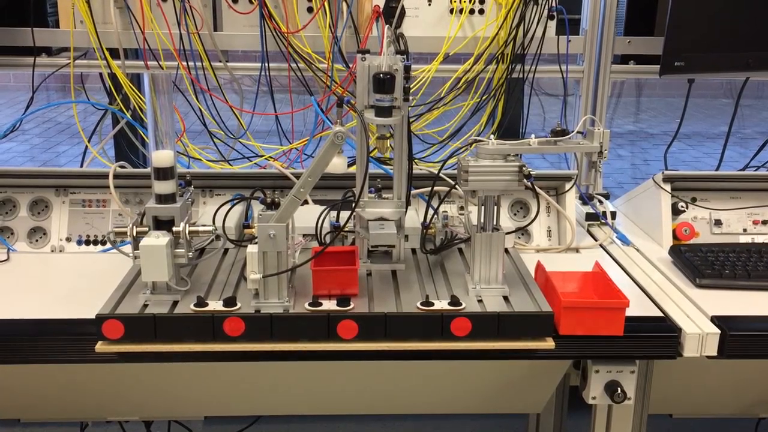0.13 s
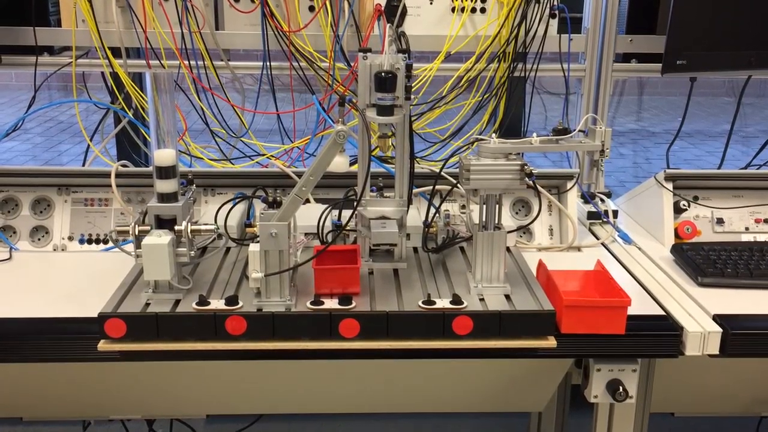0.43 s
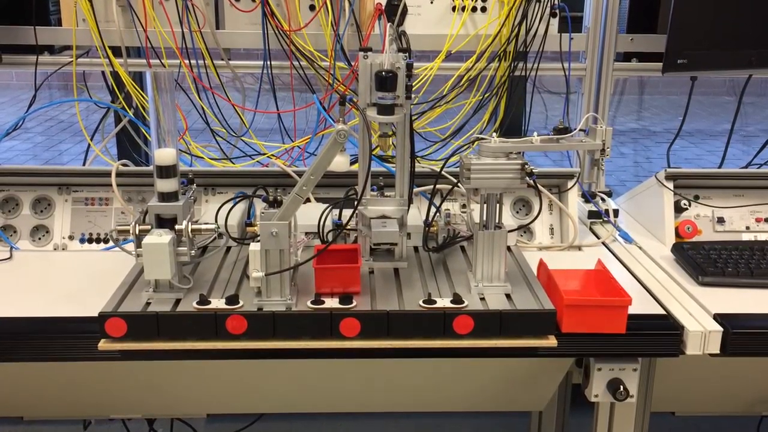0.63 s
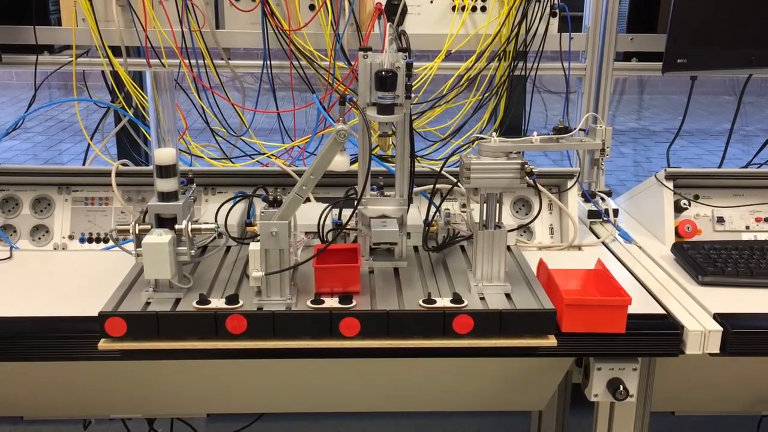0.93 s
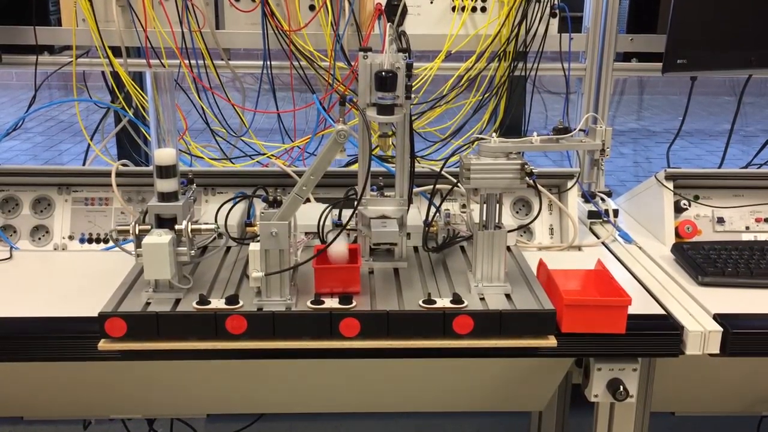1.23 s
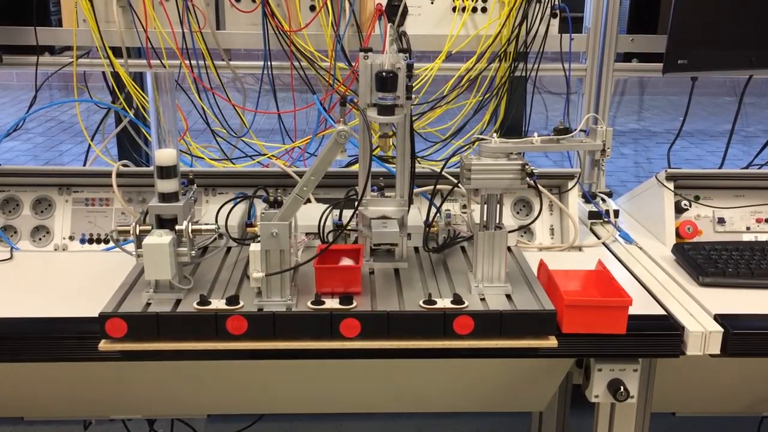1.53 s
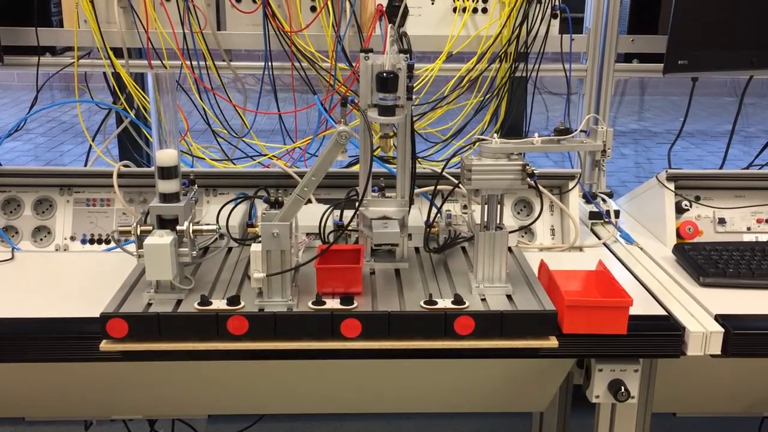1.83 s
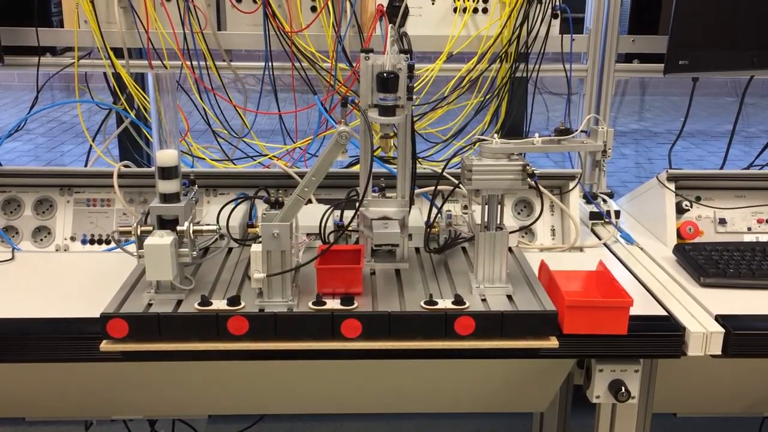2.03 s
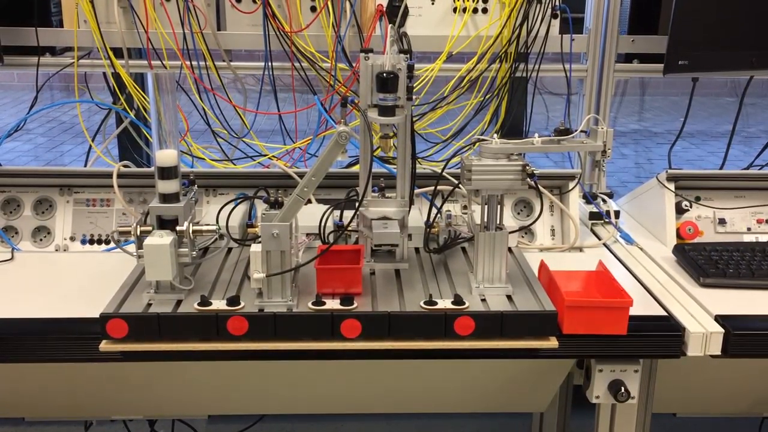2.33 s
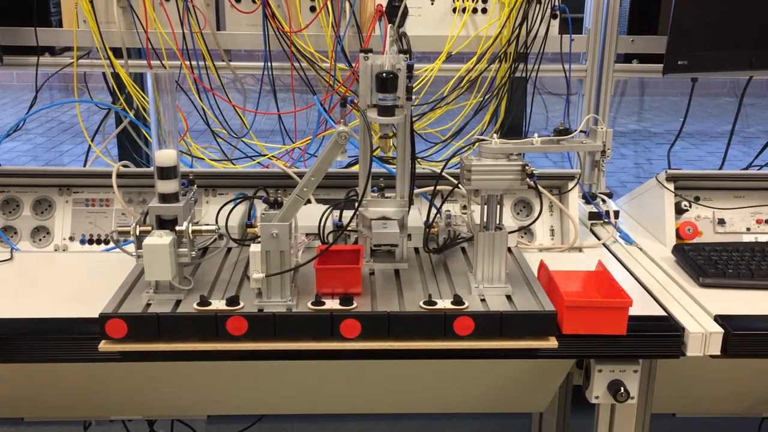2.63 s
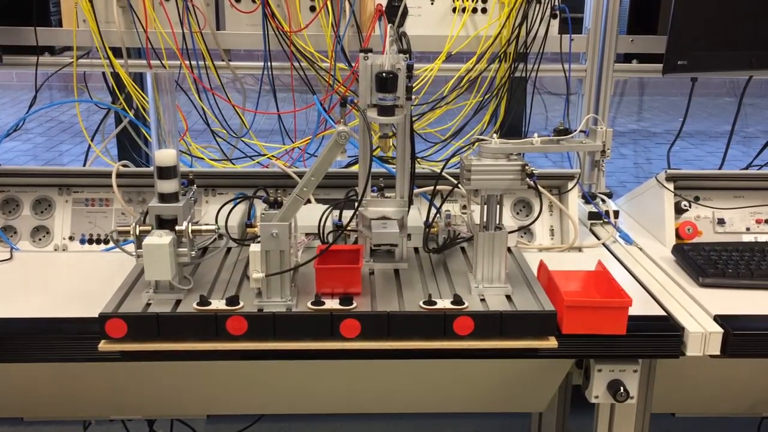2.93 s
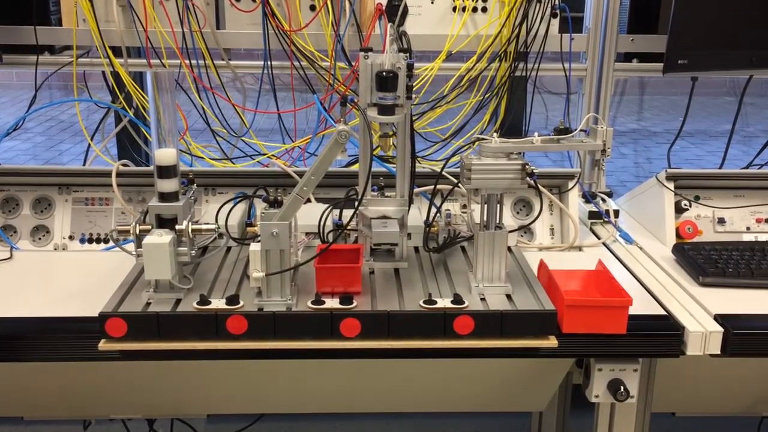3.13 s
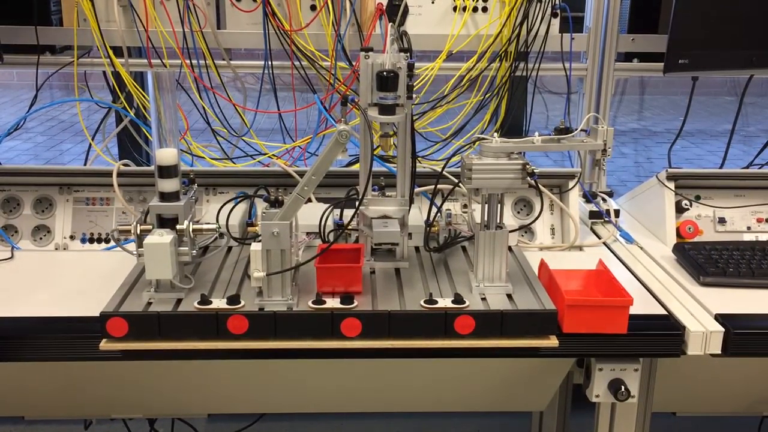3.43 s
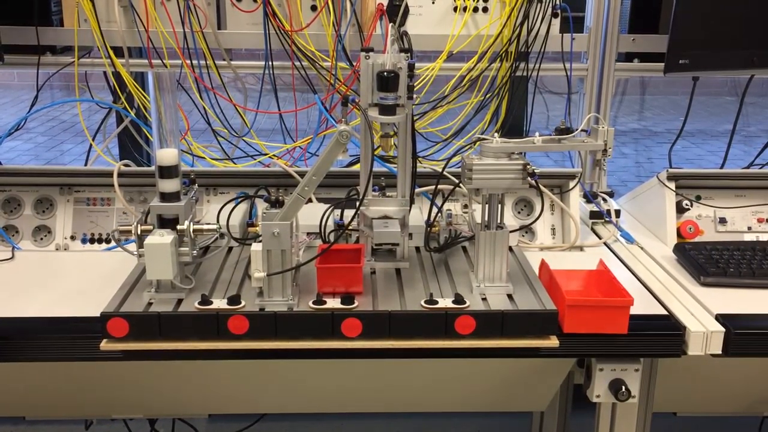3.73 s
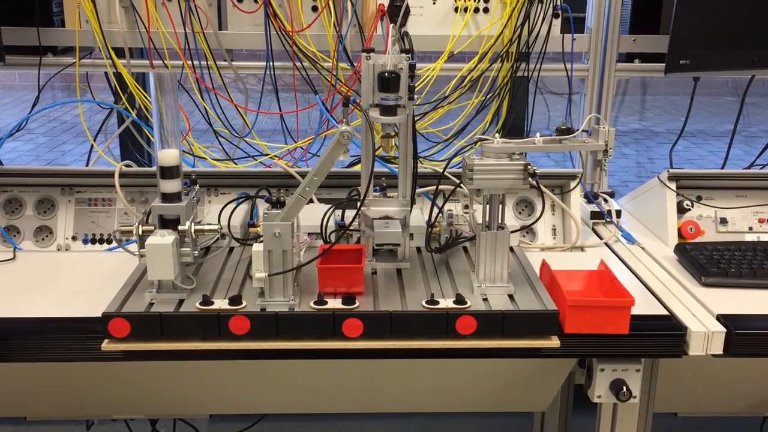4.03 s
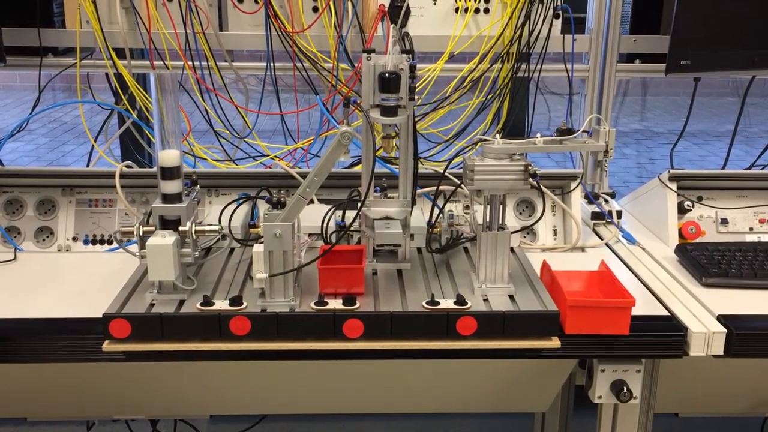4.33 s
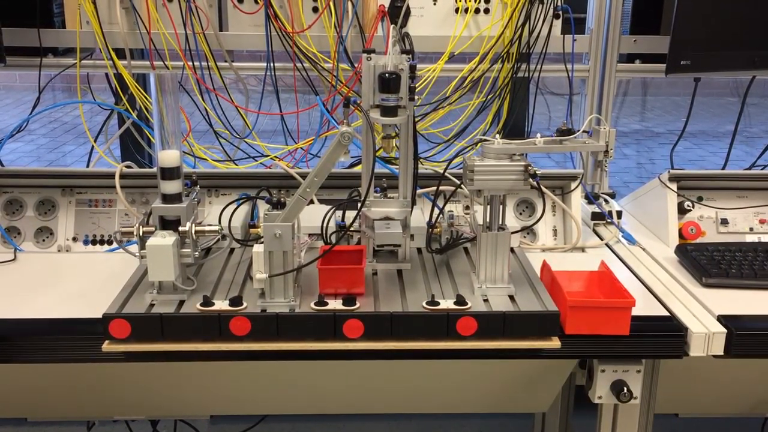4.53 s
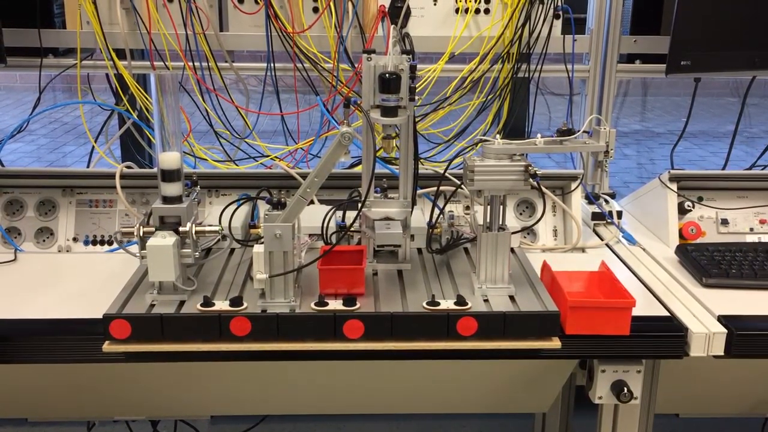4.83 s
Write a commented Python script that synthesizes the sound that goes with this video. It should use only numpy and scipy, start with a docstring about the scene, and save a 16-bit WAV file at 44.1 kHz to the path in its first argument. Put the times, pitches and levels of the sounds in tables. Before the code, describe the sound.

A nozzle on a pneumatic machine hisses steadily, then cuts off with a clack. A small hard part drops into a plastic box and bounces a few times. After a quiet stretch with faint knocks and ventilation hum, cylinders clack loudly and vent air for a second. The hiss resumes and continues, with one more clack and a small tick. A phone picks it up from about two metres in a hard-walled lab.

```python
"""A pneumatic handling station

On a bench in a hard-walled lab, a vacuum nozzle hisses with turbulent air. Cylinders strike their end
stops, shake the bench and puff air; one vents through a silencer. A dropped workpiece bounces in a
plastic box. Faint knocks, a low drone and ventilation lie behind. The room returns two echoes and a
tail of about half a second to a phone two metres away."""
import sys
import numpy as np
from scipy import signal
from scipy.fft import rfft, irfft, next_fast_len
from scipy.io import wavfile
from scipy.ndimage import uniform_filter1d

SR = 44100
rng = np.random.default_rng(int(sys.argv[2]) if len(sys.argv) > 2 else 0)


def dump_mix(stems):
    """Bounce the given channels to the path in sys.argv[1] as a 16-bit WAV at rate SR."""
    frames = np.atleast_2d(stems).T  # one column per channel
    limited = np.clip(frames, -1, 1)  # hard clip at full scale
    pcm = np.round(limited * 32767).astype(np.int16)
    wavfile.write(sys.argv[1], SR, pcm)


N = 392049
T = np.arange(N) / SR


def cylinders():
    """Impact excitation: pistons ring the aluminium frame and the bench as air cracks from the valve."""
    # Each row: start in seconds, knock level before its low-pass in dB, knock centre in Hz, chatter in
    # seconds, air crack level in dB, crack centre in Hz, bench thump level in dB.
    clacks = [(1.1983, -7.5, 1800, .0003, -27.5, 9000, -26), (4.888, -15, 1300, 0.001, -20.5, 7760, -24.5),
              (4.8916, -17.5, 1820, .001, -21, 8500, -31), (4.91, -14.5, 3050, .0002, -28, 9500, -59),
              (4.9736, -0.5, 3800, 0.000393, -9.5, 5800, -32), (4.978, -9.5, 718, .002, -37, 6000, -40),
              (4.990, -17.5, 1070, 0.00203, -13, 11000, -23.5), (4.996, -13.5, 3970, .0009, -34, 5050, -27),
              (5.949, -45, 700, 0.00187, -60, 6000, -49.5), (6.983, -32, 2800, .0015, -62, 4000, -56),
              (6.988, -9, 1670, 0.00014, -60, 4000, -29.5), (6.991, -29, 1480, 0.0021, -27.5, 7900, -49.5)]
    # Each row of both: mode frequency in Hz, relative level in dB, t60 in seconds.
    frame_modes = [(684, -12, 0.03), (945, -10.5, .025), (1235, -4.5, 0.02), (1480, 2, 0.011),
                   (1800, 0, .013), (2150, 0.5, .015), (2460, -2.5, .015), (2600, -12.5, 0.043),
                   (2980, -7, 0.014), (3420, -8.5, 0.0092), (3950, -4, .01), (4500, -2, .007),
                   (5070, -5, .008), (6180, -9, 0.024)]
    bench_modes = [(62, -12.5, 0.27), (115.7, -1.5, 0.067), (140, -5, 0.19), (163.4, -2.5, 0.22),
                   (206, 4, 0.073), (248, -1.5, .1), (308, -5, 0.062), (370, 2, .08), (480, -10, .08),
                   (600, -5.5, 0.066)]
    out = np.zeros(N)
    for start, db, hz, chatter_s, air_db, air_hz, thump_db in clacks:
        knock = ring(frame_modes, db, hz, chatter_s, slope_db=12, low_hz=.31 * hz)
        add(out, start, lowpass(knock, 2.5 * hz))  # a contact of finite length drives little treble
        add(out, start, burst(air_db, t60=.028, hz=air_hz, width=1.8 * air_hz))
        add(out, start, ring(bench_modes, thump_db, 190, chatter_s=.003, slope_db=5.5, low_hz=94))
    return out


def workpiece():
    """Free vibration: each bounce cracks sharply and leaves the plastic box ringing around 1-2 kHz."""
    # Each row: start in seconds, knock level in dB, knock centre in Hz, crack level in dB.
    bounces = [(1.4037, -0.5, 1100, -8), (1.4073, 4, 1930, -12.5), (1.425, -14, 1002, -26),
               (1.6002, -2.5, 1428, -18.5), (1.6983, 0, 1300, -17), (1.7084, -16, 1500, -26.5),
               (1.721, -14.5, 1100, -31.5), (1.769, -8.5, 1590, -25)]
    # Each row: mode frequency in Hz, relative level in dB, t60 in seconds.
    box_modes = [(980, -4, 0.065), (1090, -7.5, 0.096), (1163, 0, 0.025), (1293, -3, 0.085),
                 (1373, -1.5, 0.04), (1550, 0, .03), (1840, -4, .03), (1840, 1, 0.017), (1920, -5, 0.045),
                 (2040, -4, .03), (2176, -1.5, 0.016), (2270, -11.5, .03), (2385, -9, .02),
                 (2840, -2.5, 0.032), (3040, -10, 0.043), (3560, 1.5, .015), (3900, -11.5, 0.0078),
                 (4300, -16.5, .015), (5840, -16.5, .012), (6700, -2.5, .01)]
    out = np.zeros(N)
    for start, db, hz, crack_db in bounces:
        add(out, start, ring(box_modes, db, hz, chatter_s=.0006, slope_db=7.5, low_hz=856, scatter_db=3))
        add(out, start, burst(crack_db, t60=.03, hz=5600, width=5600))
        add(out, start, burst(crack_db - 2.5, t60=.012, hz=12500, width=5000))  # the hard piece ticks
    return out


def nozzle():
    """Jet noise: turbulence excites the nozzle's resonances; body and treble flicker independently."""
    # Each row: opening and shutting times in seconds, relative hiss level in dB, treble gain in dB.
    blows = [(-1, 1.197, -49, 2), (5, 9.5, -47.5, 3.5)]
    # Each row: frequency in Hz, relative spectral density in dB.
    jet_spectrum = [(180, -51), (300, -26), (582, -33), (797, -16.5), (895, -23.5), (1070, -12.5),
                    (1680, -9.5), (2080, 2.5), (2670, -8), (3050, -2.5), (4850, -13.5), (6530, -10),
                    (7830, -16.5), (13100, -13.5), (15700, -20)]
    # Each row: centre in Hz, width in Hz, gain in dB.
    resonances = [(1043, 60, 8), (1334, 70, 9.5), (1610, 60, -1), (2100, 200, -1), (2413, 79, 0.5),
                  (3004, 210, 4), (3490, 80, 1.5), (8480, 110, 3), (10200, 83, 3.5), (11000, 230, 4),
                  (12000, 200, 2.5), (13500, 130, 1), (5630, 150, 1.5), (5700, 150, 4.5), (6660, 150, 4.5)]
    valve_s, sag_db_per_s = .007, .47  # the supply pressure sags while air flows
    jet = coloured_noise(jet_spectrum, resonances)
    body = lowpass(jet, 4000, order=1) * undb(.7 * flicker(11))
    treble = highpass(jet, 4000, order=1) * undb(.5 * flicker(10))
    out = np.zeros(N)
    for opens, shuts, db, treble_db in blows:
        dull_db = 6 * np.exp(-np.maximum(T - opens, 0) / .07)  # the treble is dull just after opening
        hiss = body + treble * undb(treble_db - dull_db)
        out += hiss * undb(db - sag_db_per_s * (T - opens)) * gate(opens, shuts, valve_s, valve_s)
    return out * undb(-.5)


def vent():
    """Flow noise: a cylinder exhausts smoothly through a sintered silencer, with a faint whistle."""
    # Each row: frequency in Hz, relative spectral density in dB.
    silencer_spectrum = [(240, -60), (400, -35), (945, -13), (1070, -11), (1540, -13.5), (2100, -1.5),
                         (2560, -7), (2990, -0.5), (4810, -10), (5970, -10.5), (15700, -18)]
    hiss = coloured_noise(silencer_spectrum, peaks=[(11400, 360, 9.3)])
    flow = gate(on=4.99, off=5.93, rise=.11, fall=.049)
    return hiss * flow * undb(-45 + .49 * flicker(27))


def stirs():
    """Band-limited transients: faint knocks and ticks about the room, over patchy rustles."""
    # Each row: start in seconds, level in dB, centre in Hz, width in Hz, t60 in seconds.
    knocks = [(2.712, -58.5, 1500, 2500, 0.17), (2.735, -51, 257, 80.1, 0.16),
              (2.86, -60.5, 1007, 699, 0.47), (2.9, -59.5, 900, 600, 0.31), (3.14, -64.5, 1000, 500, .1),
              (3.604, -58, 1890, 1200, .09), (3.75, -64.5, 9000, 2000, 0.053), (3.8, -61, 2380, 800, 0.047),
              (4.805, -60, 793, 800, 0.058), (5.5, -56, 240, 57, 0.069), (8.6187, -30.5, 9380, 2500, 0.01),
              (8.6283, -30.5, 9260, 1500, 0.014)]
    # Each row: peak time in seconds, peak level in dB, decay rate in dB per second.
    rustles = [(2.724, -70, 90), (2.87, -69, 11), (3.5, -71.5, 100), (3.63, -70.5, 36)]
    ramp_s, hold_s = .047, .47
    swell = np.zeros(N)
    for peak, db, decay in rustles:
        window = gate(peak - ramp_s, peak + hold_s, ramp_s, ramp_s)
        swell += window * undb(db - decay * np.maximum(T - peak, 0))
    rustle = unit_rms(bandpass(rng.standard_normal(N), hz=1940, width=3000))
    out = rustle * swell * undb(2 * flicker(30))
    for start, db, hz, width, t60 in knocks:
        add(out, start, burst(db, t60, hz, width))
    return out


def drone():
    """Amplitude modulation: a low, rising tone swells and wavers, with a weak tone an octave below."""
    # Each row: time in seconds, level in dB.
    contour = [(7.1, -63.5), (7.454, -58), (7.552, -83), (7.606, -66.5), (7.8, -56), (7.952, -58),
               (8.01, -53), (8.322, -62.5), (8.356, -72), (8.61, -75.5), (8.85, -72)]
    start_hz, rise_hz_per_s = 80, 4.4
    times, db = np.transpose(contour)
    hz = start_hz + rise_hz_per_s * np.maximum(T - times[0], 0)
    phase = 2 * np.pi * np.cumsum(hz) / SR
    envelope = undb(np.interp(T, times, db, left=-150) + 1.2 * flicker(25))
    return np.sqrt(2) * envelope * (np.sin(phase) + undb(-14.5) * np.sin(phase / 2))


def room_tone():
    """Ambient noise: a broad, slowly wavering floor carries the narrow peaks of ventilation hum."""
    # Each row: frequency in Hz, relative spectral density in dB.
    floor_spectrum = [(15, -46.5), (25, -18), (53, -7), (73, -3), (91, -12.5), (110, 0), (169, -13.5),
                      (189, -5.5), (268, -11), (307, -8), (351, -13), (540, -13), (652, -15.5), (5790, -24),
                      (15700, -28)]
    # Each row: centre in Hz, width in Hz, height above the floor in dB.
    hum_peaks = [(60, 12, 8.5), (120.4, 2.7, 6.5), (156, 11, 7.5), (188, 3.4, 7), (325, 60, 5)]
    return coloured_noise(floor_spectrum, hum_peaks) * undb(-68 + 1.3 * flicker(.89))


def room(x):
    """Reverberation: direct sound, wall and ceiling echoes, then a tail whose treble dies first."""
    # Each row: delay in seconds, level before its low-pass in dB.
    echoes = [(.0095, -15), (.021, -15)]
    # Each row: band centre in Hz, t60 in seconds, relative level in dB.
    tail_bands = [(149, .45, -3.5), (293.6, 1, -9.5), (587, 0.65, -5.5), (1200, .7, -5.5), (2590, 0.62, -6),
                  (5150, 0.47, -9), (9500, .3, -9.5), (14000, 0.25, -30)]
    t = T[:SR]
    build_up = 1 - np.exp(-t / .004)
    response = np.zeros(SR)
    for delay, db in echoes:
        add(response, delay, lowpass(undb(db) * chatter(.0006), 8100))
    for hz, t60, db in tail_bands:
        tail = bandpass(rng.standard_normal(SR), hz, .78 * hz) * fade(t, t60) * build_up
        band_share = .7 * hz / (SR / 2)
        response += tail * undb(db) * np.sqrt(band_share / np.sum(tail ** 2))
    response[0] = 1
    return signal.fftconvolve(x, response)[:N]


def ring(modes, db, centre_hz, chatter_s, slope_db, low_hz, scatter_db=3.5):
    """Modal superposition: a blow peaking at db, its modes slope_db weaker per octave off centre."""
    hz, mode_db, t60 = np.transpose(modes)[:, :, None]
    chance = rng.standard_normal((len(modes), 2))
    t = T[:SR // 2]
    gain = undb(mode_db - slope_db * np.abs(np.log2(hz / centre_hz)) + scatter_db * chance[:, :1])
    detuned_hz = hz * (1 + .0099 * chance[:, 1:])
    ringing = np.sum(gain * fade(t, t60) * np.sin(2 * np.pi * detuned_hz * t), axis=0)
    struck = signal.fftconvolve(ringing, chatter(chatter_s))
    radiated = highpass(highpass(struck, low_hz), low_hz)  # a small body radiates no bass
    return radiated * undb(db) / np.abs(radiated).max()


def burst(db, t60, hz, width):
    """Transient decay: a band of chatter that starts near level db and dies quickly."""
    spread_s = t60 / 14  # time constant of the energy
    x = bandpass(np.append(chatter(spread_s), np.zeros(4096)), hz, width)
    return x * undb(db) * np.sqrt(spread_s * SR / np.sum(x ** 2))


def chatter(spread_s):
    """Group delay: the narrow bands of a flat-spectrum click arrive scattered over about spread_s."""
    bins = np.arange(4097)
    hz = bins * SR / 8192
    lateness = np.minimum(rng.exponential(size=len(bins)), 4)
    delay = .0002 + spread_s * np.interp(3 * hz * spread_s, bins, lateness)
    return irfft(np.exp(-2j * np.pi * np.cumsum(delay) * SR / 8192))[:4096]


def coloured_noise(spectrum, peaks):
    """Spectral shaping: noise of unit rms with resonance peaks on a smooth spectrum."""
    size = next_fast_len(N)
    hz = np.maximum(np.arange(size // 2 + 1) * SR / size, 1)
    knot_hz, knot_db = np.transpose(spectrum)
    db = np.interp(np.log(hz), np.log(knot_hz), knot_db) + bells(hz, peaks)
    return unit_rms(irfft(rfft(rng.standard_normal(size)) * undb(db), size)[:N])


def bells(hz, peaks):
    """Resonance curves: a sum of bell-shaped gains in dB."""
    return sum(db / (1 + (2 * (hz - centre) / width) ** 2) for centre, width, db in peaks)


def flicker(rate):
    """Random modulation: values held for 1 / rate seconds and smoothed twice, with a spread near 1."""
    hold = int(SR / rate)
    steps = np.repeat(rng.standard_normal(N // hold + 1), hold)
    return 1.3 * uniform_filter1d(uniform_filter1d(steps, hold), hold)[:N]


def gate(on, off, rise, fall):
    """Trapezoidal envelope: the gain ramps up from on and down from off, all in seconds."""
    return np.clip((T - on) / rise, 0, 1) * np.clip(1 - (T - off) / fall, 0, 1)


def bandpass(x, hz, width):
    edges = [max(hz - width / 2, 20), min(hz + width / 2, .48 * SR)]
    return signal.sosfilt(signal.butter(2, edges, "bandpass", fs=SR, output="sos"), x)


def lowpass(x, hz, order=2):
    return signal.sosfilt(signal.butter(order, min(hz, .45 * SR), fs=SR, output="sos"), x)


def highpass(x, hz, order=4):
    return signal.sosfilt(signal.butter(order, hz, "high", fs=SR, output="sos"), x)


def fade(t, t60):
    return np.exp(-np.log(1000) * t / t60)


def undb(db):
    return 10 ** (np.asarray(db) / 20)


def unit_rms(x):
    return x / np.sqrt(np.mean(x ** 2))


def add(out, start, x):
    i = int(start * SR)
    out[i:i + len(x)] += x[:N - i]


def scene():
    """Superposition: the reverberant station sounds over the drone and the room tone."""
    background = room_tone()
    air = nozzle() + vent()
    station = room(cylinders() + stirs() + air)
    box = room(workpiece())  # the box stands apart, so the room answers it differently
    return (station + box + drone() + background)[None]


def record(dry):
    """Filtering and saturation: the phone's port colours the treble, peaks round off, the top is cut."""
    # Each row: centre in Hz, width in Hz, gain in dB.
    port_dips = [(4860, 280, -6.5), (7740, 1300, -3.5), (10300, 770, -7), (12300, 2700, -2.5)]
    ceiling, top_hz = .7, 15720
    size = next_fast_len(N)
    hz = np.arange(size // 2 + 1) * SR / size
    coloured = irfft(rfft(dry, size) * undb(bells(hz, port_dips)), size)[:, :N]
    rounded = ceiling * np.tanh(coloured / ceiling)
    return signal.sosfilt(signal.ellip(16, .2, 70, top_hz, fs=SR, output="sos"), rounded)


dry = scene()
out = record(dry)
dump_mix(out)
```